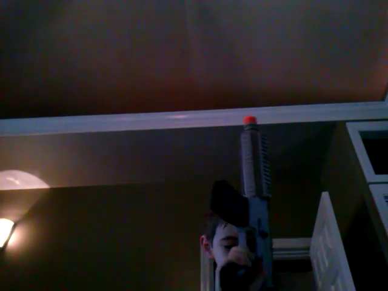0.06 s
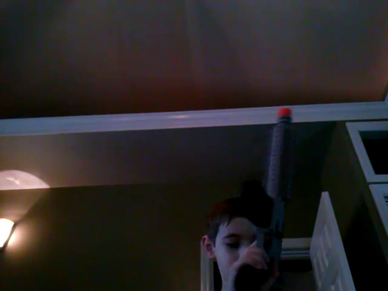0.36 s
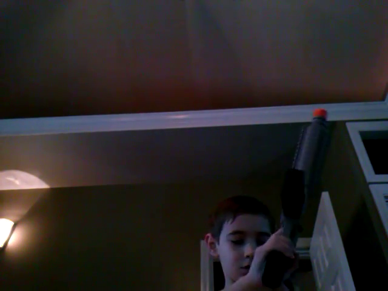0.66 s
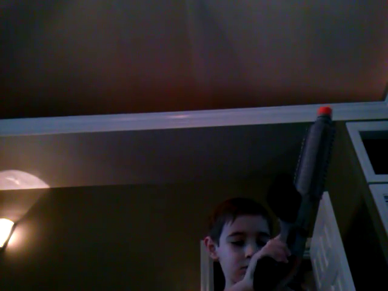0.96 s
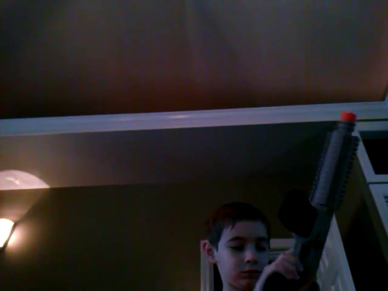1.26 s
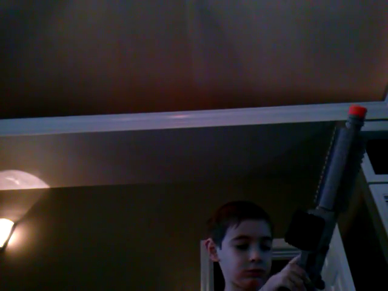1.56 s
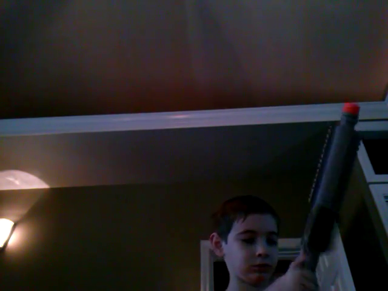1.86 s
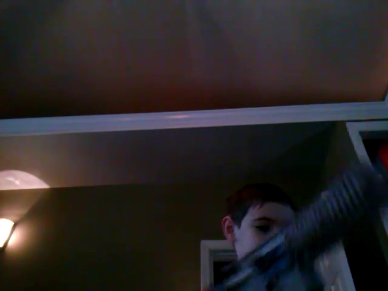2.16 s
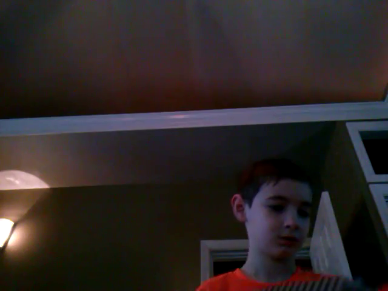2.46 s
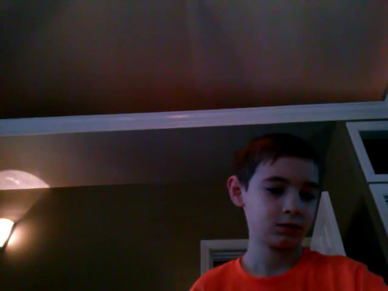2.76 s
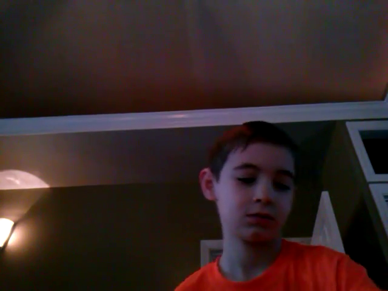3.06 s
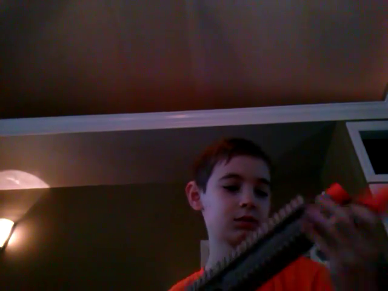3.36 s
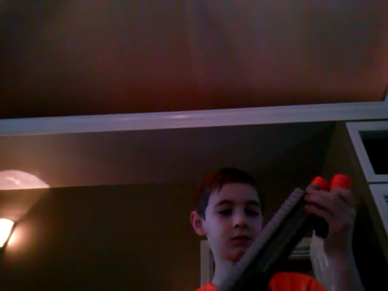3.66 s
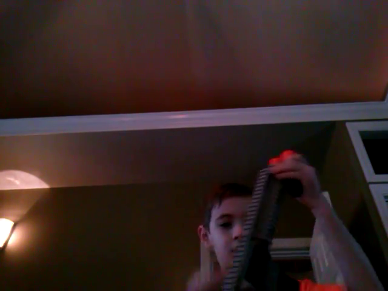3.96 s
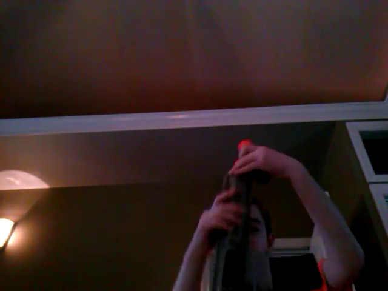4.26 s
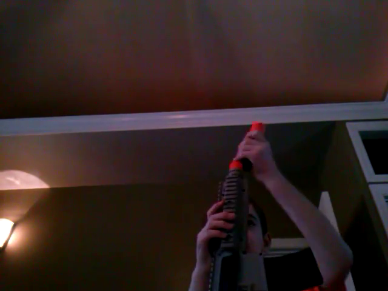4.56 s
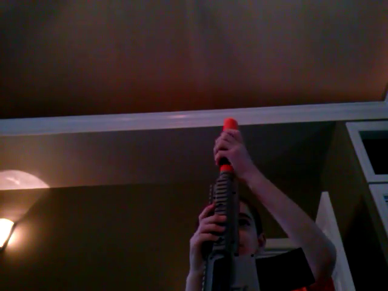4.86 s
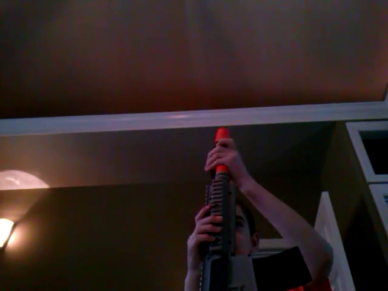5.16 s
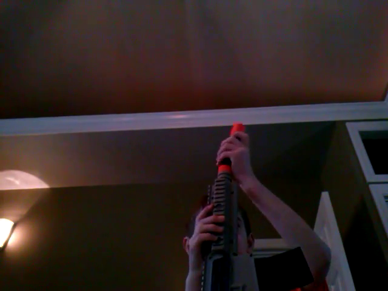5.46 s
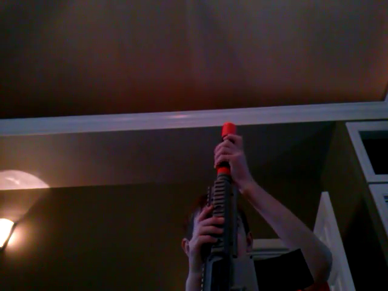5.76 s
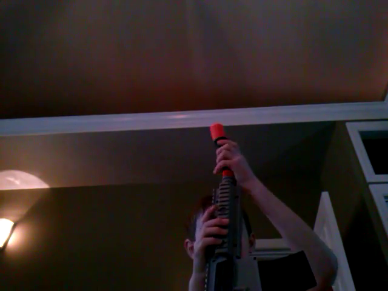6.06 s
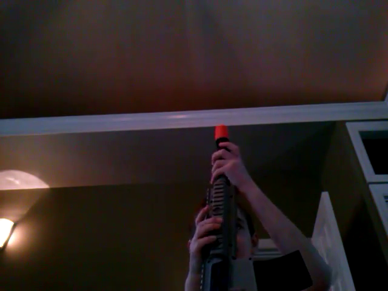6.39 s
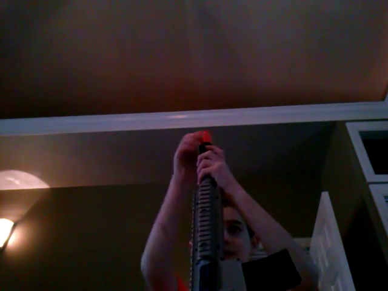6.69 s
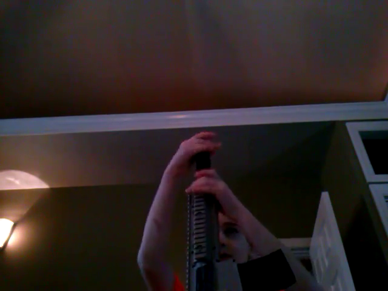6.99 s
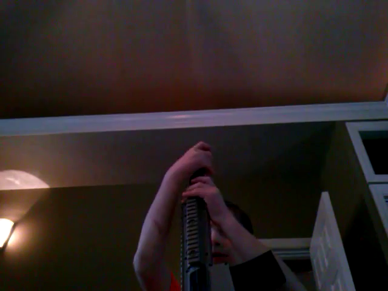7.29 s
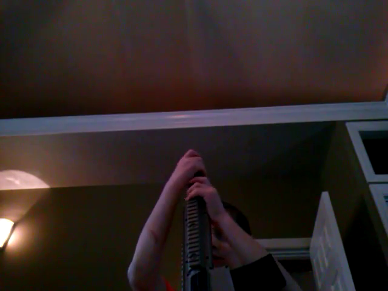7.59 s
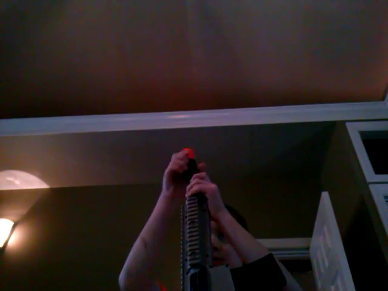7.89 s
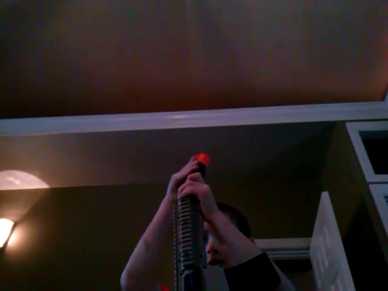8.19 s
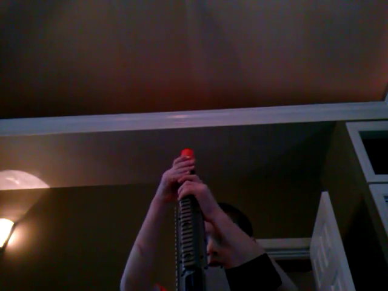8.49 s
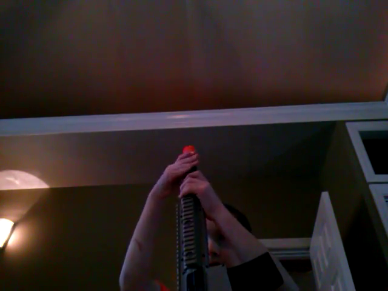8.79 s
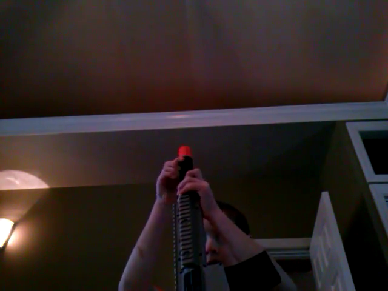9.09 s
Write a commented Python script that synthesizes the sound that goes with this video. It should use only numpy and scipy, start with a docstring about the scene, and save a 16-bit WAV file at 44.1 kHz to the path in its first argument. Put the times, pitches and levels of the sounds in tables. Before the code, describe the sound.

Irregular plastic clicks, clacks and scrapes as a piece is twisted onto a toy gun, over faint microphone hiss.

```python
"""A hollow plastic toy gun knocks and snaps as it is turned over and its muzzle piece is twisted on.
Each catch that snaps and each part that bumps makes the shell ring for a moment.
In between, plastic and skin rub, tight parts squeal and the seams creak.
A small room echoes the toy, over the hiss of a close microphone and a low rumble of stirred air."""
import sys
import numpy as np
from scipy import signal
from scipy.fft import rfft, irfft
from scipy.io import wavfile
from scipy.ndimage import uniform_filter1d

SR = 44100
rng = np.random.default_rng(int(sys.argv[2]) if len(sys.argv) > 2 else 0)


def persist_wave(psi):
    """Save psi, clipped to +-1, as 16-bit WAV."""
    counts = np.round(np.clip(psi, -1, 1) * 32767).astype(np.int16)
    wavfile.write(sys.argv[1], SR, np.atleast_2d(counts).T)


N = 411894
TIME = np.arange(N) / SR

# Tone curves: how strong each pitch is in a sound. Columns: pitch_hz, level_db
HISS_CURVE = [(20, 7), (60, 10), (110, 8.5), (200, 5.5), (770, 2.5), (1700, -1), (2600, -1), (5400, -3),
              (8100, -2.5), (13700, 1), (16100, 0), (18000, -9.5)]  # the microphone's own noise
RUMBLE_CURVE = [(12, -11), (28, -3.5), (65, -0.5), (100, -14), (180, -15.5), (400, -38)]  # stirred air
WALL_CURVE = [(100, -10), (300, 0.5), (1000, -2.5), (2500, -3.5), (5000, -2), (10000, -1.5), (17000, -11.5)]  # what the walls send back
DRONE_CURVE = [(60, -49), (200, -8), (380, 0), (780, 2), (1100, -1), (1500, -6), (2300, -31.5)]  # the hollow shell, shaken by small slips
SCRAPE_CURVE = [(900, -36.5), (1500, -6), (2000, 4.5), (2700, 2.5), (3300, -1), (3900, -3.5), (4900, -12),
                (7000, -25.5), (10000, -31)]  # plastic on plastic
SWISH_CURVE = [(2500, -21), (5000, -10), (7500, -5.5), (10000, -1), (13500, 5), (15500, 5.5), (18000, -12)]  # skin on plastic
TICK_CURVE = [(1500, -36.5), (4000, -5.5), (5200, -5), (7200, -9.5), (8500, -3), (10000, 0.5), (11500, 0),
              (13200, 6.5), (15000, -1.5), (18000, -11)]  # the spot where two parts hit

# Big movements that stir the air and the desk. Columns: start_s, length_s, level_db
BIG_MOVES = [(1.39, .06, -57), (2.81, 0.23, -52), (3.0, .14, -58.5), (3.42, .1, -60.5), (3.53, 0.11, -58),
             (4.29, 0.23, -63), (5.15, 0.14, -61), (5.57, 0.072, -63), (6.1, 0.12, -54.5), (6.2, 2.74, -66),
             (9.1, 0.22, -66), (6.87, 0.11, -62), (8.18, 0.091, -58)]
# Squeals of tightly fitting plastic. Columns: start_s, end_s, pitch_hz, width_hz, level_db
TIGHT_SQUEALS = [(-.06, 0.058, 1750, 520, -52.5), (0.463, 0.602, 3250, 800, -53),
                 (0.724, 0.964, 3340, 700, -64), (3.806, 3.96, 3140, 402, -64),
                 (4.81, 4.867, 4400, 450, -57), (4.804, 4.86, 5540, 1100, -58),
                 (4.897, 4.97, 4040, 450, -56), (4.91, 5.02, 2850, 350, -53), (5.046, 5.08, 4000, 500, -45),
                 (5.03, 5.093, 5600, 1300, -55.5), (5.064, 5.168, 2560, 500, -46.5),
                 (5.09, 5.15, 3670, 450, -52), (6.114, 6.123, 4200, 2420, -42)]
# Rubbing strokes: the hands shift, lift the toy, shove the muzzle piece along and twist it.
# Columns: start_s, length_s, scrape_db, drone_db, swish_db (the last two are added to scrape_db)
RUB_STROKES = [ (0.091, 0.044, -51.5, -12.5, 3.5), (0.142, 0.063, -55.5, -7.5, 0),
               (0.276, 0.23, -63, -8, 3), (0.411, 0.16, -59.5, 1.5, 4), (0.664, 0.23, -61.5, -3.5, -0.5),
               (0.822, .3, -62, -7, -1.5), (1.13, 0.28, -68, -6, -2), (1.403, 0.031, -33, -5, -4),
               (1.815, .19, -59, -8, 3), (2.077, 0.17, -62.5, -1, 3.5), (2.792, 0.13, -68.5, -16, 18.5),
               (2.881, .22, -65.5, 10, 9.5), (3.032, 0.057, -61, -11, 14), (3.118, 0.055, -76.5, -9, 19),
               (3.274, 0.12, -65, -4, 3.5), (3.57, 0.2, -57.5, -8, -3), (3.726, 0.07, -55.5, -11, 4.5),
               (3.77, .21, -58, -7, 6), (4.1, .08, -56.5, 0, 1), (4.283, 0.14, -60, 5.5, -2),
               (4.695, 0.14, -72, 1, -6), (4.776, 0.1, -53.5, -0.5, -15), (4.857, 0.22, -55.5, 0, -18),
               (5.029, 0.15, -48.5, -4, -14), (5.154, 0.11, -51, -2, -10), (5.248, 0.058, -45.5, -5.5, -23),
               (5.263, 0.22, -61.5, 0.5, -18), (5.961, 0.097, -70.5, 3, 8), (6.866, 0.16, -60, -2, 2.5),
               (6.995, 0.35, -65, 3.5, -7), (7.536, .27, -65.5, -0.5, -3), (9.082, 0.16, -71.5, 6, 2),
               (9.213, 0.072, -57.5, -1, 0)]
# Faint, steady rubbing of hands that never quite rest. Columns: scrape_db, drone_db, swish_db
RESTING_RUB = (-78, -80, -74.5)
# The shell's own tones, cut short by the hands. Columns: pitch_hz, ring_s (time to fade 60 dB), level_db
SHELL_TONES = [(328.5, 0.011, -1), (462, 0.01394, 0.5), (700, 0.025, -1), (790, 0.026, 2),
               (960, 0.013, -1.5), (1075, 0.023, -4), (1332, 0.014, -0.5), (1500, 0.036, -4),
               (1870, 0.0064, 9), (2300, 0.0086, 2.5), (2610, 0.019, 1), (2960, 0.0076, 3),
               (3540, 0.011, -2), (4000, 0.0047, -3), (5030, .007, -12)]
# Knocks and snaps: the toy is tilted, a catch snaps home, the muzzle piece goes in and is twisted.
# Columns: start_s, level_db, thump_db, clack_db, tick_db, knock_pitch_hz, clack_pitch_hz
# (thump_db, clack_db and tick_db are added to level_db)
HITS = [ (0.129, -24.5, -3, 1, -14, 850, 2230), (0.4915, -11, -6, 7, -1.5, 1350, 3240),
        (0.792, -32.5, -15, 3, -1, 800, 2660), (1.071, -28.5, -2, 0, -9, 860, 2300),
        (1.088, -22, -1.5, 8, -6, 1500, 1830), (1.276, -24.5, -4, -9, -21, 914, 2150),
        (1.379, -22, -10, 6.5, -6, 1170, 2100), (1.393, -13.5, -12, -17, -14, 930, 2550),
        (1.414, 1, -23, -3.5, -36, 896, 2380), (1.435, 3.5, -10, -4.5, -21, 995, 2360),
        (1.828, -33, -20, 0.5, 2, 940, 2790), (1.979, -24, -14, 5.5, 5, 1420, 2100),
        (2.208, -17, -25, -8, -30, 1310, 2060), (2.8067, -27, -4, 5.5, 12.5, 1050, 3200),
        (2.855, -21.5, -1.5, 3, 6, 1170, 3500), (3.417, -29, -7, -5, -3, 1210, 2420),
        (3.4398, 2.5, -22, 8.5, 3.5, 1220, 3100), (3.445, -1.5, -20, 0, -3, 1020, 2420),
        (3.452, 3, -28, -19, -13, 1270, 2990), (3.4545, 1.5, -19, -21, -20, 1350, 2960),
        (3.551, -24.5, 2.5, -11, 9, 1250, 2140), (4.092, -19, -8, -1.5, 1, 770, 3440),
        (4.1188, -25, -27, 11.5, 4, 1060, 2550), (4.129, -17, -31, -3.5, -7, 840, 2700),
        (4.314, -21.5, -19, -18, -15, 960, 2210), (4.399, -25, 0, -18, -18, 745, 2190),
        (4.655, -8, -3.5, -11, -12, 720, 2470), (5.184, -9.5, -5.5, -5.5, -3, 740, 2300),
        (5.222, -32, 0, 9, -1, 930, 2240), (5.235, -5, -6, -7.5, -22, 790, 2330),
        (5.42, -33.5, 3, 1, -1, 1080, 2360), (5.58, -16, 2, 3.5, -14, 845, 2900),
        (5.943, -33, -16.5, 0.5, -1.5, 980, 3050), (6.1184, -15.5, -1, 9, 5.5, 840, 3640),
        (6.120, -3, -6.5, -8, -22, 840, 2460), (6.497, -27, -22, 0, -1, 810, 2660),
        (6.511, -41, -9, 5, 17.5, 1020, 3520), (6.58, -31, -2.5, -19, -14, 770, 2120),
        (7.064, -19, -5, -6, -13, 800, 2420), (7.141, -27, -7, -16, -15, 1280, 2710),
        (7.174, -16.5, -2.5, -8, -23, 790, 2300), (7.443, -40, 0, 8.5, 1, 1200, 2610),
        (8.127, -23.5, -7, -20, -15, 770, 2440), (8.198, -10, -1.5, -3.5, -2, 1007, 2300),
        (8.238, -21, -12, -21, -15, 1100, 2130), (8.478, -15.5, -6, -13.5, -17, 1020, 1880)]


def undb(db):
    """Turn decibels into a number to multiply by."""
    return 10 ** (np.asarray(db) / 20)


def unit_energy(x):
    """Scale a short sound to a total energy of one."""
    return x / np.sqrt(np.sum(x ** 2))


def unit_level(x):
    """Scale a long sound to a typical size of one."""
    return x / np.std(x)


def fade(t, ring_s):
    """A fade that drops 60 dB every ring_s seconds."""
    return np.exp(-np.log(1000) * t / ring_s)


def colour(x, curve, size=4096):
    """Filter a sound so that it follows a tone curve."""
    hz, db = np.transpose(curve)
    grid_hz = np.maximum(np.arange(size // 2 + 1) * SR / size, 1)
    gain = undb(np.interp(np.log(grid_hz), np.log(hz), db))
    # fold the filter so that it never rings before the sound arrives
    folded = irfft(np.log(gain))
    folded[1:size // 2] *= 2
    folded[size // 2 + 1:] = 0
    return signal.oaconvolve(x, irfft(np.exp(rfft(folded))))[:len(x)]


def wander(per_s):
    """A random drift up and down, with a typical size of one."""
    points = rng.standard_normal(N // 20)
    return unit_level(np.interp(TIME * per_s, np.arange(len(points)), points))


def even_noise(shape, band_hz):
    """A burst of noise with the given shape, evened out over bands wider than band_hz."""
    n = len(shape)
    spectrum = rfft(rng.standard_normal(n) * shape, 2 * n)
    power = uniform_filter1d(np.abs(spectrum) ** 2, max(int(2 * n * band_hz / SR), 1))
    return irfft(spectrum / np.sqrt(power))[:n]


def movements(rows, build_share=0.21, let_go_share=0.32, ease_db=1.5):
    """Strength of movements over time: each builds up, eases off a little and lets go."""
    power = np.zeros(N)
    for start_s, length_s, level_db in rows:
        span = slice(*np.searchsorted(TIME, [start_s, start_s + length_s]))
        done = (TIME[span] - start_s) / length_s
        shape = np.clip(np.minimum(done / build_share, (1 - done) / let_go_share), 0, 1)
        power[span] += (shape * undb(level_db - ease_db * (done - 1.5))) ** 2
    return np.sqrt(power)


def slips(per_s, spread_db, smooth):
    """Surfaces stick and let go: many tiny uneven clicks over the noise of smooth sliding."""
    sizes = rng.standard_normal(N) * undb(spread_db * rng.standard_normal(N))
    clicks = unit_level(sizes * (rng.random(N) < per_s / SR))
    return unit_level(clicks + smooth * rng.standard_normal(N))


def background(hiss_db=-60.5, still_air_db=-75.5):
    """Even microphone hiss, and a low rumble that swells when big movements stir the air."""
    hiss = unit_level(colour(rng.standard_normal(N), HISS_CURVE))
    rumble = unit_level(colour(rng.standard_normal(N), RUMBLE_CURVE))
    stir = np.hypot(undb(still_air_db), movements(BIG_MOVES))
    return undb(hiss_db) * hiss + stir * rumble


def room(x, ring_s=0.33, treble_loss_s=0.25, treble_hz=3500, tail_db=-7.5, ceiling_s=0.012, ceiling_db=-13):
    """A small room sends back one ceiling echo and a short tail whose treble dies first."""
    t = TIME[:SR * 2 // 3]
    build = np.minimum(t / .008, 1) ** 2  # the nearest walls take a moment to answer
    tail = even_noise(fade(t, ring_s) * build, band_hz=70)
    low = signal.sosfiltfilt(signal.butter(2, treble_hz, fs=SR, output="sos"), tail)
    treble = (tail - low) * np.exp(-t / treble_loss_s)
    echoes = undb(tail_db) * unit_energy((low + treble) * build)
    echoes[int(ceiling_s * SR)] += undb(ceiling_db)
    return signal.oaconvolve(x, colour(echoes, WALL_CURVE))[:N]


def hand_strokes():
    """How strong the scrape, drone and swish are over time: strokes on top of faint steady rubbing."""
    start_s, length_s, scrape_db, drone_db, swish_db = np.transpose(RUB_STROKES)
    layers_db = (scrape_db, scrape_db + drone_db, scrape_db + swish_db)
    return [np.hypot(movements(zip(start_s, length_s, level_db)), undb(resting_db))
            for level_db, resting_db in zip(layers_db, RESTING_RUB)]


def creaks(strength, per_s=28, spread_db=3, gain_db=-7):
    """While the toy is gripped, its seams let go in stray little ticks."""
    lets_go = rng.random(N) < per_s / SR
    sizes = undb(spread_db * np.clip(rng.standard_normal(N), -2, 2))
    return strength * undb(gain_db) * unit_level(colour(lets_go * sizes, DRONE_CURVE))


def squeals(gain_db=-1):
    """Where the fit is tight, the slips gather around one pitch that swells and dies away."""
    slipping = slips(per_s=1300, spread_db=3.5, smooth=0.93)
    out = np.zeros(N)
    for start_s, end_s, pitch_hz, width_hz, level_db in TIGHT_SQUEALS:
        peak = signal.iirpeak(pitch_hz, pitch_hz / (width_hz * np.sqrt(2)), fs=SR)
        tone = unit_level(signal.lfilter(*peak, signal.lfilter(*peak, slipping)))
        span = (TIME > start_s) & (TIME < end_s)
        swell = np.sin(np.pi * (TIME[span] - start_s) / (end_s - start_s))
        out[span] += undb(level_db + gain_db) * tone[span] * swell
    return out


def rubbing(scrape_strength, drone_strength, swish_strength, grip_db=2.5, scrape_db=-1, drone_db=-2):
    """Parts scrape in fits and starts, the same slips drone in the shell, and skin swishes over it."""
    grip = undb(grip_db * wander(per_s=70))
    plastic = slips(per_s=1100, spread_db=0.5, smooth=1.0) * grip
    skin = slips(per_s=4000, spread_db=1.5, smooth=1.283) * np.sqrt(grip)
    scrape = scrape_strength * undb(scrape_db) * unit_level(colour(plastic, SCRAPE_CURVE))
    drone = drone_strength * undb(drone_db) * unit_level(colour(plastic, DRONE_CURVE))
    swish = swish_strength * unit_level(colour(skin, SWISH_CURVE))
    return scrape + drone + swish


def contact_tick(t, ring_s=.0058, chatter_s=0.04, chatter_db=-19):
    """A bright, gritty tick where two parts meet, with a fainter chatter that lasts longer."""
    shape = fade(t, ring_s) + undb(chatter_db) * fade(t, chatter_s)
    return unit_energy(colour(even_noise(shape, band_hz=1517), TICK_CURVE))


def crack(t, pitch_hz, ring_s=0.012, pitch_ratio=1.312, level_db=0.5):
    """Many crowded shell tones die so fast that they blur into a burst of noise around one pitch."""
    band = signal.butter(2, [pitch_hz / pitch_ratio, pitch_hz * pitch_ratio], "band", fs=SR)
    burst = even_noise(fade(t, ring_s), band_hz=602)
    return undb(level_db) * unit_energy(signal.lfilter(*band, burst))


def shell_ring(t, knock_hz, clack_hz, detune=0.045, scatter_db=1.5, db_per_octave=7, travel_s=.0008):
    """One hit rings the shell's tones, returned in three groups: low, middle and high."""
    pitch_hz, ring_s, level_db = np.transpose(SHELL_TONES)
    group = np.digitize(pitch_hz, [600, 1700])
    shift, scatter, direction = rng.standard_normal((3, len(pitch_hz)))
    # the spot that is hit favours tones near its own pitch
    octaves_away = np.abs(np.log2(pitch_hz / np.choose(group, [pitch_hz, knock_hz, clack_hz])))
    gain = np.sign(direction) * undb(level_db + scatter_db * scatter - db_per_octave * octaves_away)
    held_hz = pitch_hz * (1 + detune * shift)  # the grip puts each tone a little out of tune
    # the shake reaches the far panels late, so the tones do not start together
    age = np.maximum(t - travel_s * rng.random((len(pitch_hz), 1)), 0)
    tones = gain[:, None] * fade(age, ring_s[:, None]) * np.sin(2 * np.pi * held_hz[:, None] * age)
    return [unit_energy(tones[group == k].sum(axis=0)) for k in range(3)]


def knocks(thump_trim_db=-0.5, bass_cut_hz=220):
    """Each hit on the shell is a hollow thump, a knock, a hard clack and a tick, all at once."""
    t = TIME[:SR // 12]
    out = np.zeros(N + len(t))
    for start_s, level_db, thump_db, clack_db, tick_db, knock_hz, clack_hz in HITS:
        low, middle, high = shell_ring(t, knock_hz, clack_hz)
        tick = undb(tick_db) * contact_tick(t)
        thump = undb(thump_db + thump_trim_db) * low
        knock = unit_energy(middle + crack(t, knock_hz))
        clack = undb(clack_db) * unit_energy(high + crack(t, clack_hz))
        start = int(start_s * SR)
        out[start:start + len(t)] += undb(level_db) * (thump + knock + clack + tick)
    # a small shell gives off little bass
    return signal.sosfilt(signal.butter(3, bass_cut_hz, "high", fs=SR, output="sos"), out[:N])


def scene():
    """The toy, its echo in the room and the background, in one channel."""
    scrape, drone, swish = hand_strokes()
    toy = knocks() + rubbing(scrape, drone, swish) + squeals() + creaks(drone)
    return (toy + room(toy) + background())[None]


def record(dry, top_hz=18300, offset=.0028):
    """The microphone's electronics clip at full level, cut the highest treble and sit just off zero."""
    treble_cut = signal.ellip(9, .1, 70, top_hz, fs=SR, output="sos")
    return signal.sosfilt(treble_cut, np.clip(dry, -1, 1)) + offset


dry = scene()
out = record(dry)
persist_wave(out)
```